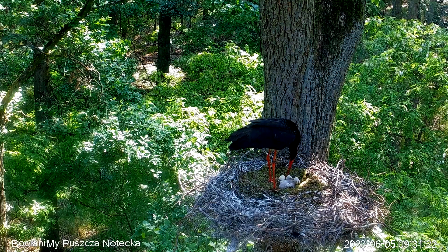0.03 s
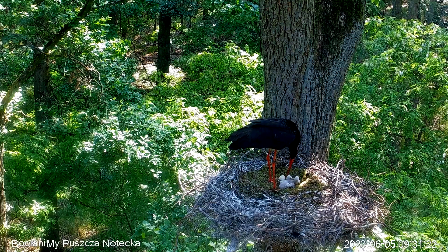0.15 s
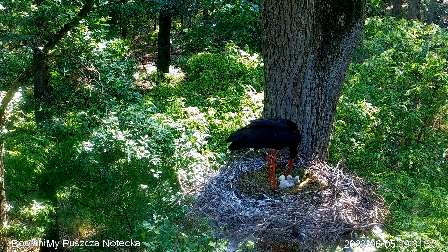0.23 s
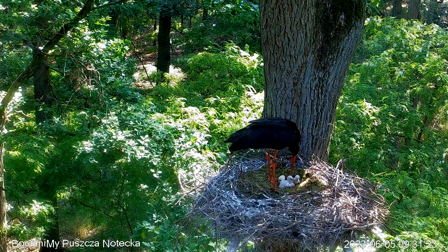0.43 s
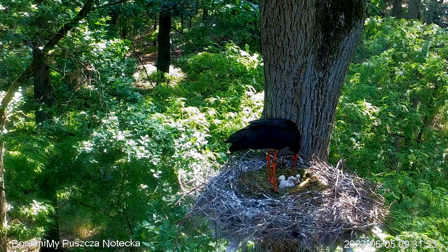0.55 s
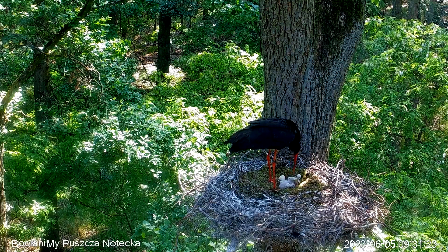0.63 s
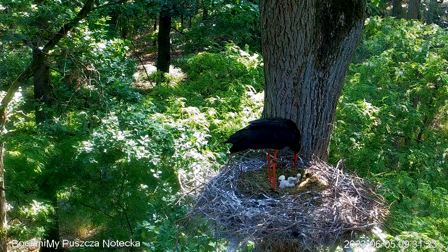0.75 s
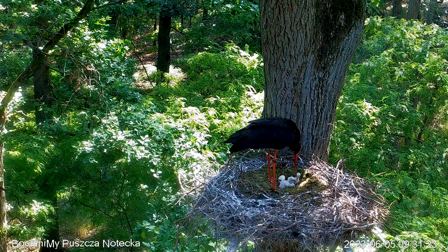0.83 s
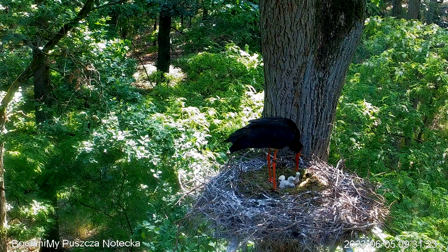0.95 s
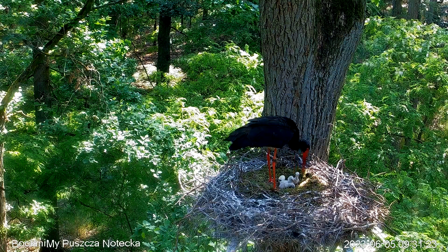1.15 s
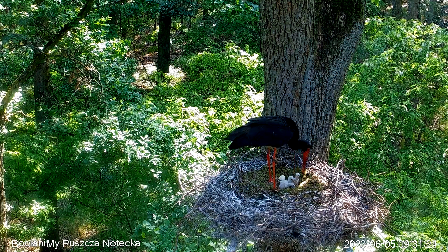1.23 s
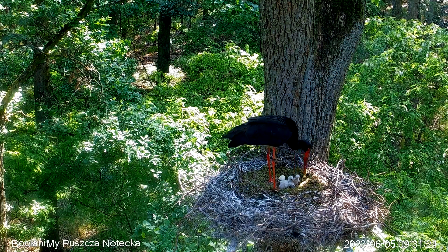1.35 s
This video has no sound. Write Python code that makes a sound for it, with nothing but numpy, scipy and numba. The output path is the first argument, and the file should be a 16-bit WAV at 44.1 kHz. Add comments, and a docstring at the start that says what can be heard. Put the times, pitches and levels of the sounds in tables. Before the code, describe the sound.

Short, high peeps from stork chicks come about nine a second, opening and closing with dry rasps. The calls scatter slightly among the trees, above a quiet forest hush, faint far whistles and soft knocks in the nest.

```python
"""In a forest tree nest, stork chicks beg: short, high peeps, about nine a second, some with a dry rasp.
A peep is a harmonic tone that holds one note, then flicks up and falls back; a rasp is a train of
pulses ringing the throat's resonances. Trunks and leaves scatter the calls. Faint far birds,
soft knocks in the nest, a forest hush and a low rumble of air lie behind."""
import sys
import numpy as np
from scipy import signal
from scipy.fft import rfft, irfft
from scipy.io import wavfile
from scipy.ndimage import uniform_filter1d
from numba import njit

SR = 44100
rng = np.random.default_rng(int(sys.argv[2]) if len(sys.argv) > 2 else 0)


def put_to_file(sound):
    """Save the sound as 16-bit audio at rate SR, in the file named by the first command-line argument."""
    columns = np.atleast_2d(sound).T  # one column per channel
    safe = np.clip(columns, -1, 1)
    whole_steps = np.round(safe * 32767)
    wavfile.write(sys.argv[1], SR, whole_steps.astype(np.int16))


N = 61739


def undb(db):
    """Level in decibels to amplitude ratio."""
    return 10 ** (np.asarray(db) / 20)


def unit(x):
    """Normalisation to rms 1."""
    return x / np.sqrt(np.mean(x ** 2))


def curve(at, rows):
    """Linear interpolation between rows."""
    return np.interp(at, *np.array(rows, float).T)


def noise():
    """White Gaussian noise."""
    return rng.standard_normal(N)


def walk(rate):
    """Low-passed noise of rms 1, with about `rate` changes a second."""
    span = max(int(SR / rate), 1)
    return unit(uniform_filter1d(uniform_filter1d(noise(), span), span))


@njit
def bandpass(x, hz, width_hz):
    """Second-order resonator with unit gain at its moving centre frequency."""
    y, band_state, low_state = np.empty(len(x)), 0., 0.
    for i in range(len(x)):
        g, damping = np.tan(np.pi * hz[i] / SR), width_hz / hz[i]
        band = (band_state + g * (x[i] - low_state)) / (1 + g * (g + damping))
        band_state = 2 * band - band_state
        low_state += 2 * g * band
        y[i] = damping * band
    return y


def resonate(x, hz, width_hz):
    """Two resonators in cascade give steep skirts; the output has rms 1."""
    hz = hz + np.zeros(N)
    return unit(bandpass(bandpass(x, hz, float(width_hz)), hz, float(width_hz)))


def colour(x, rows):
    """Spectral shaping by (f/Hz, gain/dB) points on a logarithmic frequency axis."""
    hz, db = np.array(rows, float).T
    f = np.maximum(np.arange(N + 1) * SR / (2 * N), 1)
    gain = undb(np.interp(np.log(f), np.log(hz), db))
    return irfft(rfft(x, 2 * N) * gain)[:N]


def hush_and_rumble(t):
    """Filtered noise: a broadband hush of distant trees and a narrow, low band of rumbling air."""
    # relative spectral density of the hush: f/Hz, level/dB
    hush_spectrum = [(30, -4.5), (60, -6.5), (100, -3), (160, -9.5), (250, -5), (400, -9.5), (600, -7.5),
                     (800, -6), (1050, -0.5), (1300, -2), (1600, -8.5), (2000, -12), (2600, -9.5),
                     (3400, -2), (4300, -9), (5300, -16.5), (5800, -24), (7100, -20), (9000, -79.5)]
    # envelope of the hush: t/s, level/dB
    hush_level = [(0, -59.5), (.2, -58.5), (.5, -56), (1.05, -56.5), (1.2, -58.5), (1.4, -59.5)]
    # envelope of the rumble: t/s, level/dB
    rumble_level = [(0, -71), (.2, -83), (.42, -62), (.8, -82), (.99, -56.5), (1.12, -67.5), (1.4, -72.5)]
    hush = unit(colour(noise(), hush_spectrum)) * undb(curve(t, hush_level))
    rumble = resonate(noise(), hz=31.5, width_hz=24) * undb(curve(t, rumble_level))
    return hush + rumble


def far_birds(t):
    """Narrow-band noise under Gaussian envelopes: faint whistles, blurred by distance."""
    # notes: middle t/s, half length/s, f/Hz, glide/(Hz/s), level/dB
    notes = [(0.108, 0.058, 5250, 0, -67.5), (0.283, .03, 4660, 1, -64.5), (.305, .015, 2850, 1, -59.5),
             (.39, .025, 2947, -5.5, -54.5), (0.596, 0.054, 2678, 16.5, -55.5), (0.712, .03, 2753, -3, -54),
             (0.869, 0.087, 2704, -1, -62), (0.974, 0.05, 2005, -2, -61), (1.099, 0.06, 2438, 1492, -60.5),
             (1.161, .03, 2954, 8016, -57), (1.172, 0.037, 4460, -1500, -68),
             (1.353, 0.061, 4005, -1200, -58.5), (1.389, 0.047, 2205, 4, -56.5),
             (1.397, 0.038, 3420, 3, -54)]
    birds = 0
    for at, half, hz, glide, db in notes:
        pitch = hz + glide * np.clip(t - at, -2 * half, 2 * half)
        whistle = resonate(noise(), pitch, width_hz=.045 * hz)
        birds += undb(db) * whistle * np.exp(-((t - at) / half) ** 2)
    return birds


def nest_knocks(t):
    """Noise-driven resonances rise linearly and decay exponentially: dull knocks, as of sticks shifting."""
    # knocks: onset t/s, f/Hz, level/dB
    knocks = [(0.288, 140, -70), (.33, 943, -52), (0.446, 1017, -55), (.46, 164.5, -62), (.675, 378, -62.5),
              (0.699, 857, -53), (0.759, 270, -62), (1.083, 765, -63.5), (1.293, 243.5, -58.5)]
    attack_s, decay_s = .03, .017
    sticks = 0
    for at, hz, db in knocks:
        rise = np.clip((t - at) / attack_s, 0, 1)
        decay = np.exp(-np.maximum(t - at - attack_s, 0) / decay_s)
        sticks += undb(db) * resonate(noise(), hz, width_hz=59) * rise * decay
    return sticks


def reverberation(x, t, t60_s, gap_s):
    """Diffuse reflections: convolution with exponentially decaying noise of unit energy."""
    response = noise() * undb(-60 * t / t60_s) * (t > gap_s)
    return signal.fftconvolve(x, response / np.linalg.norm(response))[:N]


def forest(direct, t):
    """Multipath: direct sound, a trunk reflection, scatter from nest and leaves, and the forest's tail."""
    trunk_delay_s = .00356
    trunk = undb(-5.5) * np.interp(t - trunk_delay_s, t, direct)
    scatter = undb(-8.5) * reverberation(direct, t, t60_s=.088, gap_s=.01)
    tail = undb(-23.5) * reverberation(direct, t, t60_s=.23, gap_s=.016)
    return direct + trunk + scatter + tail


def rasp(t, at, attack, release, rate, breathiness, low_db, high_db, high_hz, fall, width_hz):
    """Source and filter: puffs of air ring the low throat resonances, while uneven pulses and puffs together
    ring a falling high one."""
    # low resonances of the throat: f/Hz, width/Hz, relative level/dB
    low_throat = [(1716, 260, -6.5), (2145, 540, 2), (2897, 380, 0)]
    low_lead_s, low_length_ratio = .0087, .75

    def swell(lag):
        """Gaussian envelope with separate attack and release."""
        return np.exp(-(lag / np.where(lag < 0, attack, release)) ** 2)

    cycle = np.cumsum(rate * (1 + .18 * breathiness * walk(150))) / SR % 1
    clicks = unit(1. * (np.diff(cycle, prepend=0) < 0))
    puffs = unit(noise() * (np.exp(-cycle / .053) + .15))  # a burst of air each cycle over steady breath
    source = (1 - breathiness) * clicks + breathiness * puffs
    low = unit(sum(undb(db) * resonate(puffs, hz, width) for hz, width, db in low_throat))
    high = resonate(source, np.clip(high_hz - fall * (t - at), 3830, 5300), width_hz)
    low_swell = swell((t - at + low_lead_s) / low_length_ratio)
    return undb(low_db) * low * low_swell + undb(high_db) * high * swell(t - at)


def peep(t, start, hold, hz, start_db, end_db, flick_db, flick_hz):
    """Frequency-modulated harmonics plus throat noise: a lead-in, a held note, a rough flick up and back."""
    # harmonics 1 to 4, of which the strong second is the pitch heard: level/dB
    harmonics = [-34, -2, -42.5, -34.5]
    # resonances of the hiss that rides on the tone: f/Hz, width/Hz, relative level/dB
    hiss_bands = [(2700, 360, -4), (5278, 220, -2.5)]
    lead_s, flick_rise_s, flick_fall_s = .01481, .006, .012
    attack_s, release_s = .0097, .024  # each spans 40 dB
    sag_hz_per_s, jitter_per_s, flutter_db = 6500, 430, 1.5
    end = start + hold
    top = end + flick_rise_s
    done = top + flick_fall_s

    sag = sag_hz_per_s * hold / 2
    pitch = np.interp(t, [start - lead_s, start - lead_s / 4, start + lead_s / 4, end, top, done],
                      [3463, 3707, hz + sag, hz - sag, flick_hz, 3793])
    roughness = np.interp(t, [start, start + hold / 2, end, top], [.8, 0, 0, 1])
    jitter = (.0076 + .05 * roughness) * walk(jitter_per_s)
    fundamental = pitch / 2 * (1 + jitter)
    phase = 2 * np.pi * np.cumsum(fundamental) / SR
    tone = sum(undb(db) * np.sin(k * phase) for k, db in enumerate(harmonics, 1))

    hiss = sum(undb(db) * resonate(noise(), f, width) for f, width, db in hiss_bands)
    hoarse = resonate(noise(), hz=3487, width_hz=293) * (1 + roughness) / 2  # main throat resonance
    voice = np.sqrt(2) * tone + undb(-26.5) * hiss + undb(-6) * hoarse

    level = np.interp(t, [start - lead_s, start, end - flick_rise_s / 2, top, done],
                      [start_db - 14.5, start_db, end_db, flick_db, flick_db - 2])
    level -= 40 * np.maximum(start - lead_s - t, 0) / attack_s
    level -= 40 * np.maximum(t - done, 0) / release_s
    level += flutter_db * roughness * walk(jitter_per_s)
    return voice * undb(level)


def scene():
    """Superposition of the chicks' scattered calls and the sounds behind them."""
    # rasps: peak t/s, attack/s, release/s, pulse rate/Hz, breathiness (0-1), low part's level/dB,
    # high resonance's level/dB, its f/Hz, its fall/(Hz/s), its width/Hz
    rasp_calls = [(0.244, 0.016, 0.025, 330, .8, -47.5, -47.5, 4520, 55000, 850),
                  (0.803, .012, 0.017, 300, .8, -54.5, -43, 5060, 12000, 1025),
                  (0.931, 0.016, 0.016, 330, .8, -45, -40.5, 4890, 30000, 650),
                  (1.055, 0.012, 0.025, 122, .12, -52.5, -50, 5230, 1200, 616)]
    # peeps: held note's start t/s, length/s, f/Hz, start level/dB, end level/dB; flick level/dB, top f/Hz
    peep_calls = [(0.344, 0.014, 3270, -45.5, -41, -42, 3970), (0.444, 0.013, 3618, -37, -30, -33.5, 4005),
                  (0.558, .013, 3343, -41, -29, -36.5, 4125), (0.674, .019, 3466, -35, -30, -37.5, 4017),
                  (.791, .024, 3608, -35.5, -38, -36.5, 4000), (.897, 0.032, 3550, -36, -41.5, -37, 3920)]
    t = np.arange(N) / SR
    rasps = sum(rasp(t, *row) for row in rasp_calls)
    rasps = colour(rasps, [(5544, 0), (5744, -19)])  # the microphone dulls the rasps' treble
    chicks = sum(peep(t, *row) for row in peep_calls) + rasps
    return (forest(chicks, t) + far_birds(t) + nest_knocks(t) + hush_and_rumble(t))[None]


def record(dry):
    """Band limiting: a steep elliptic low-pass cuts the top treble."""
    cutoff_hz = 7160
    return signal.sosfilt(signal.ellip(10, .2, 70, cutoff_hz, fs=SR, output="sos"), dry)


dry = scene()
out = record(dry)
put_to_file(out)
```